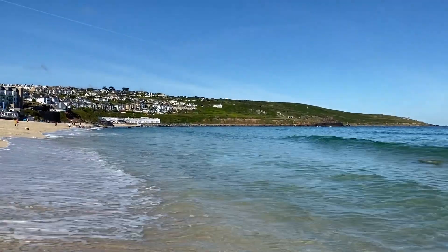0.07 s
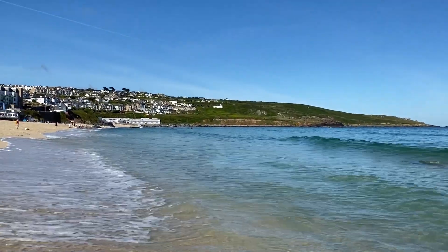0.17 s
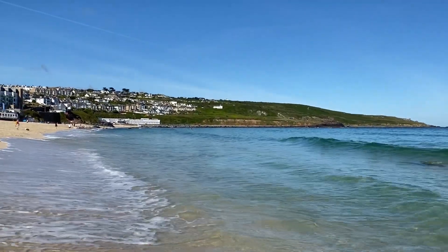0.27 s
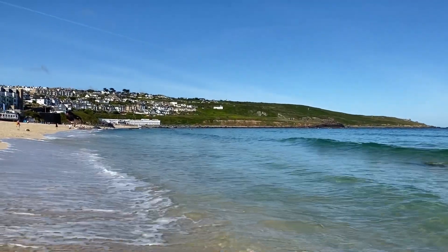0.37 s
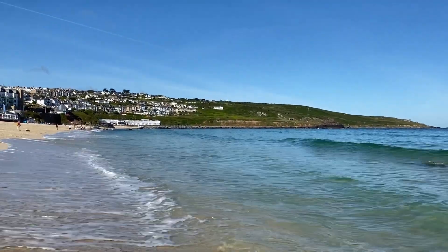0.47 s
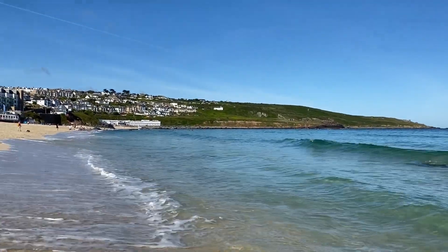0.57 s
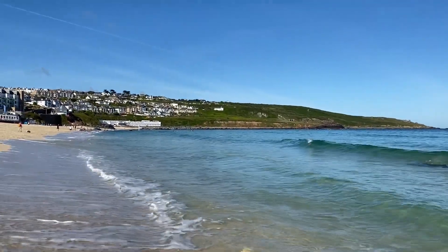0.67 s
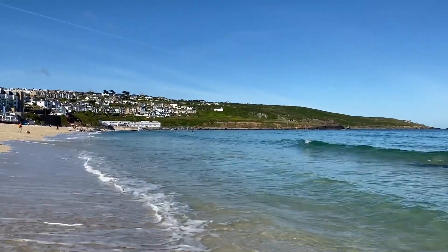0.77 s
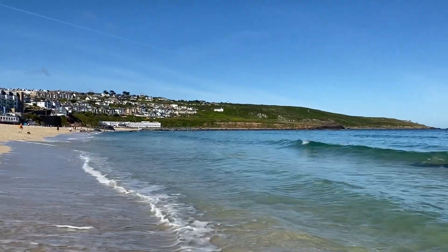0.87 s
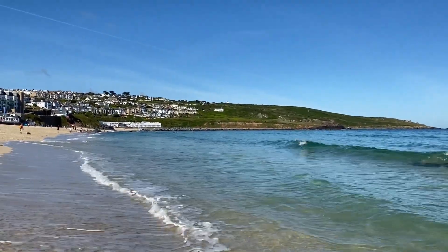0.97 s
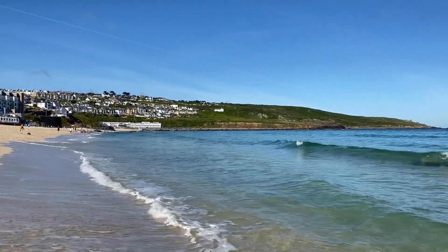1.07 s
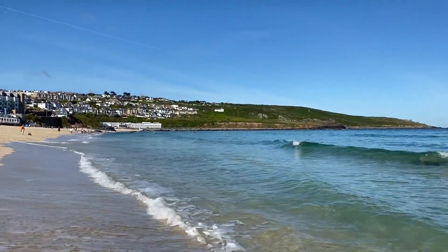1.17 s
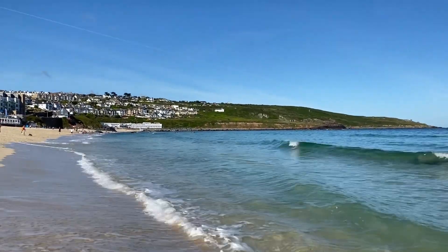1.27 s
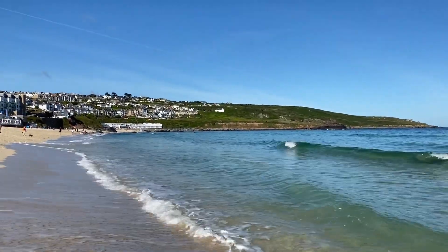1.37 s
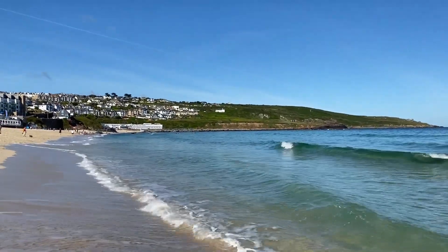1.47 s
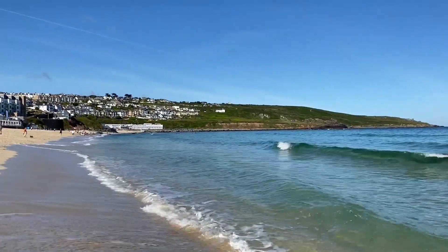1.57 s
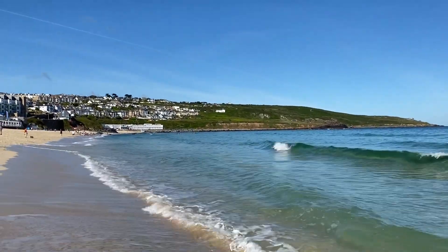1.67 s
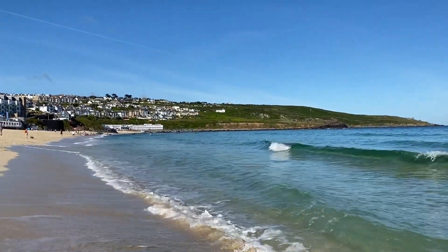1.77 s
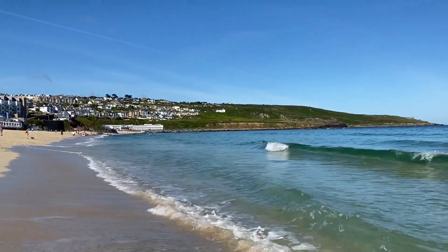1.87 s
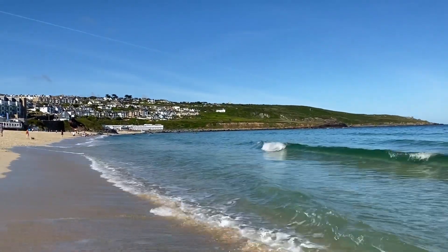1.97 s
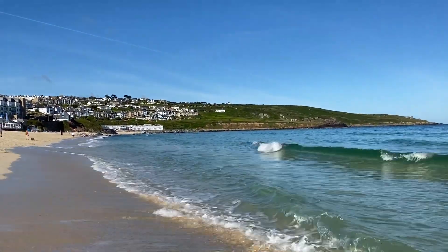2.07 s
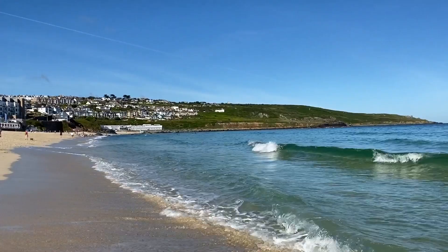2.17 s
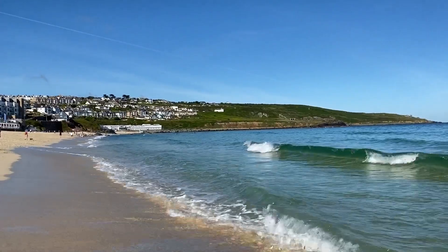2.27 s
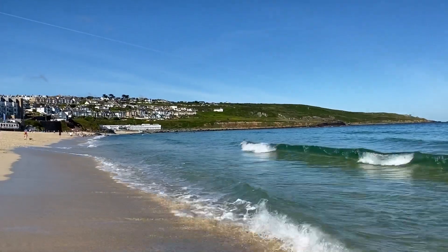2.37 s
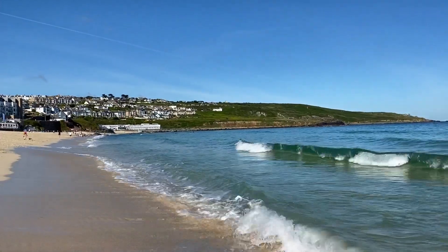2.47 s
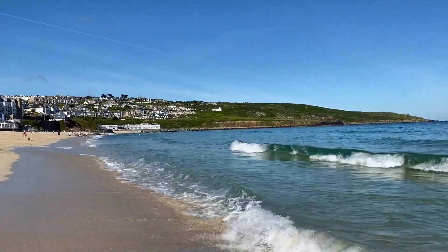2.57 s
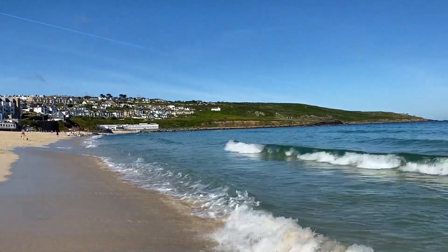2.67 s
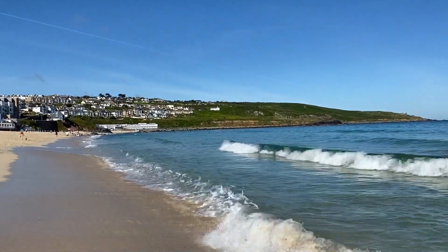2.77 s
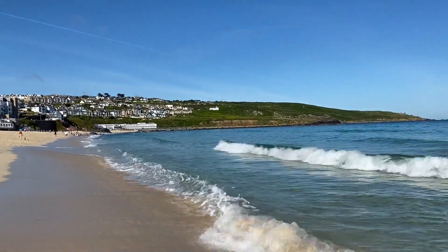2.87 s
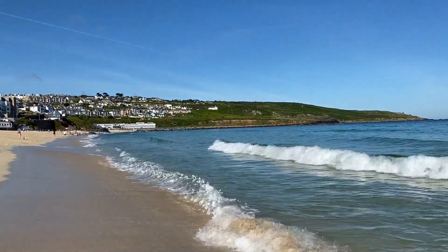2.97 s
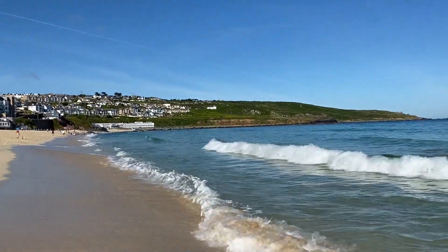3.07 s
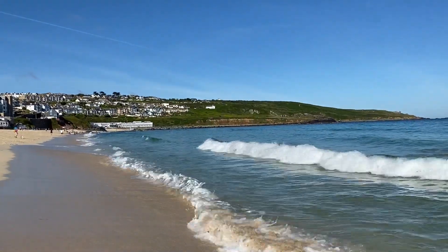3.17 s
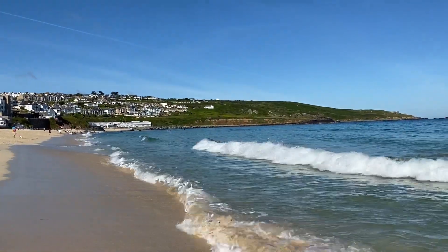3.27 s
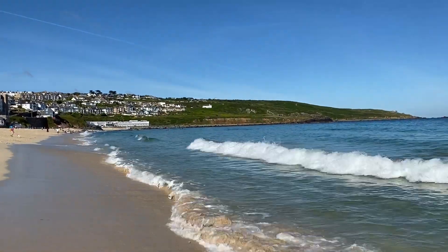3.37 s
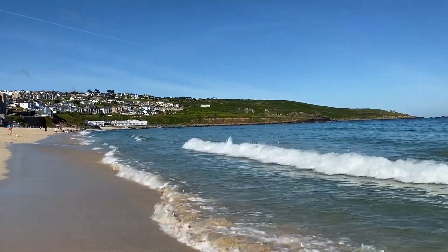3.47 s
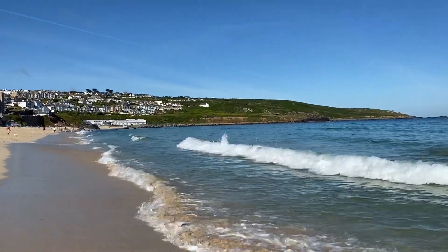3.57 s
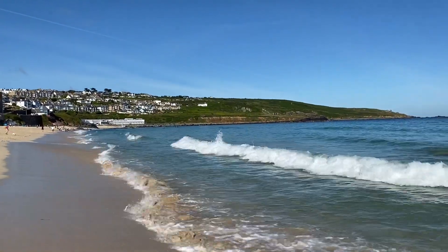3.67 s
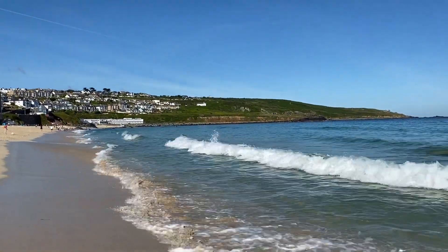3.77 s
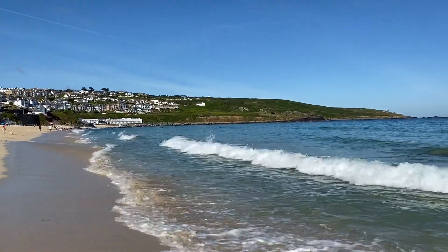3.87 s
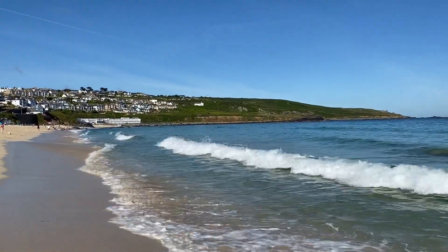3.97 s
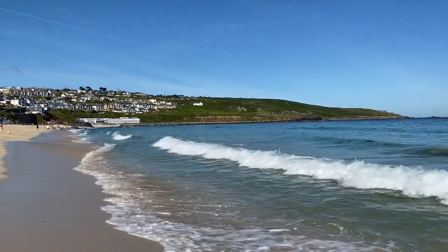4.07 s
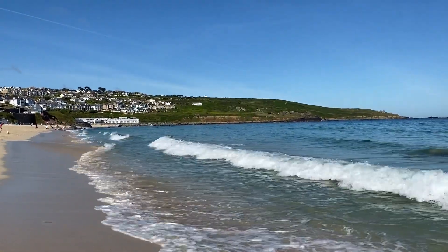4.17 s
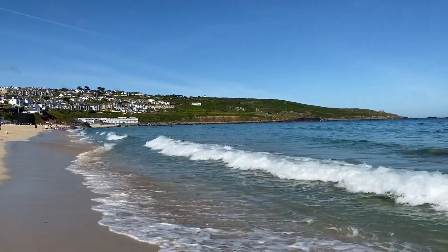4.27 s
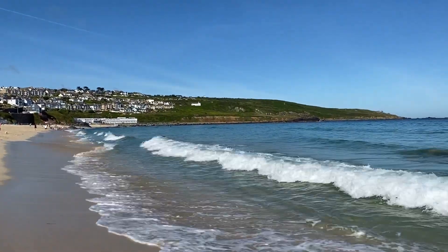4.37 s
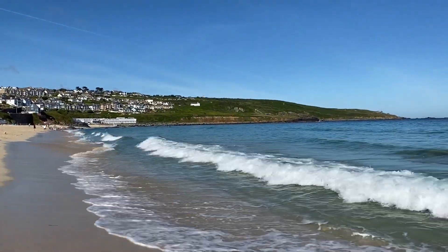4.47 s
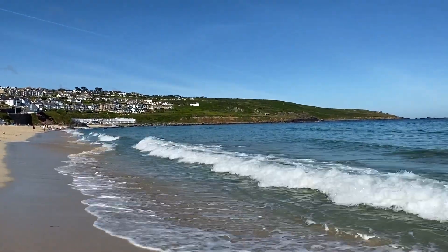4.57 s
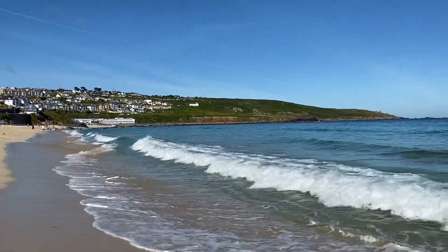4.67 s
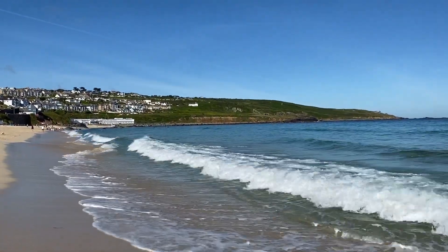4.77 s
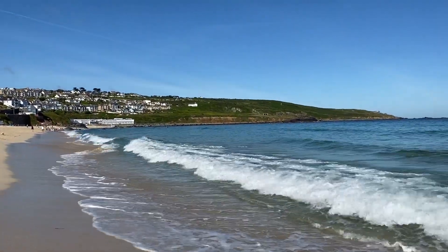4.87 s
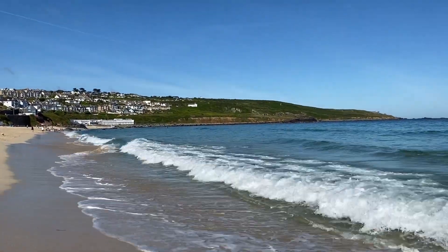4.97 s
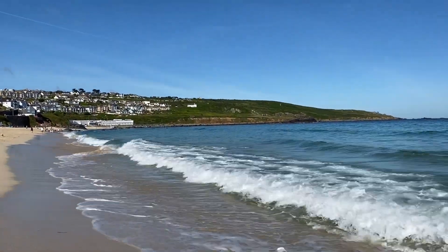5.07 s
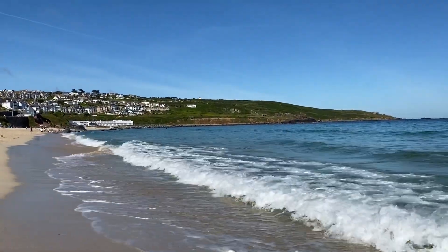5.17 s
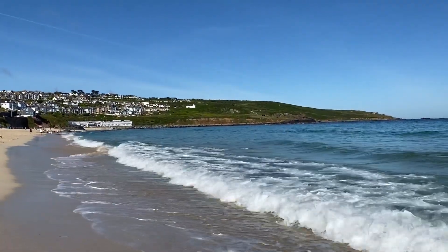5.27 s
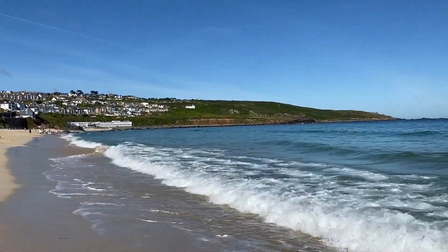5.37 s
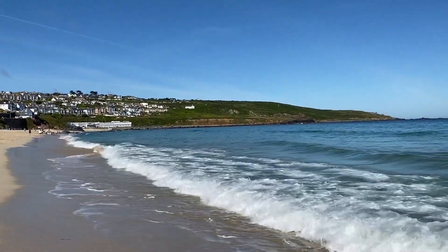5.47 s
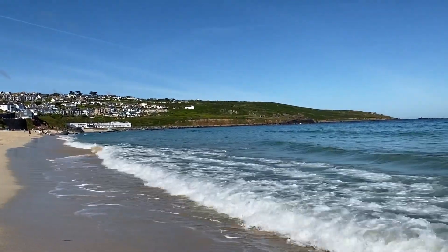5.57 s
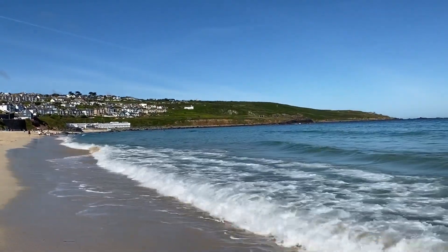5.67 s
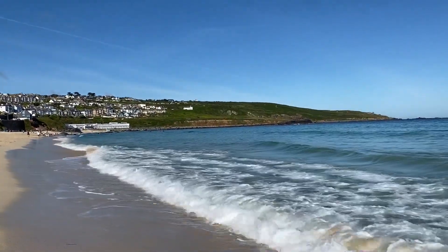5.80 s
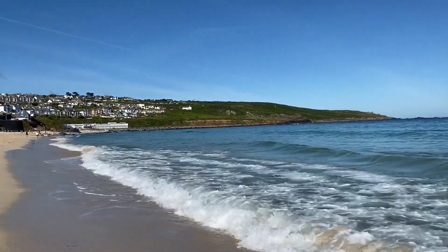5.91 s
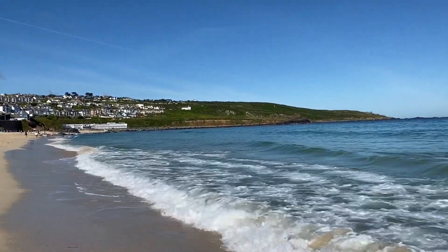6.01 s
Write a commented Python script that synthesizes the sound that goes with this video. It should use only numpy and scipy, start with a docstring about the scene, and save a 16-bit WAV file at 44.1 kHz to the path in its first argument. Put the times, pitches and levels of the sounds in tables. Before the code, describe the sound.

At the edge of a sandy beach, thin swash plops, gurgles and crackles with distinct bubbles. At about two seconds a small wave collapses close by with a low thump, roar and bright spray, while wind softly buffets the microphone. It ebbs into foam wash as a second wave swells and spills ashore. Close outdoor stereo, no echoing space.

```python
"""Small waves break and wash up a sandy beach, heard at the water's edge through two close microphone ports.
Roar, wash, spray and fizz are lumpy noise bands and bubble swarms that follow each wave's level.
Thin swash plops and fizzes, a wave collapses close by, a second rolls in behind it.
Single bubbles ring, short and long noise bursts splash, thump and rumble, and low noise gusts buffet
the microphone."""
import sys
import numpy as np
from scipy import signal
from scipy.fft import rfft, irfft
from scipy.io import wavfile
from scipy.ndimage import uniform_filter1d

SR = 44100
rng = np.random.default_rng(int(sys.argv[2]) if len(sys.argv) > 2 else 0)


def put_to_file(sound):
    """Save the sound as 16-bit audio at rate SR, in the file named by the first command-line argument."""
    columns = np.atleast_2d(sound).T  # one column per channel
    safe = np.clip(columns, -1, 1)
    whole_steps = np.round(safe * 32767)
    wavfile.write(sys.argv[1], SR, whole_steps.astype(np.int16))


N = 266364
WINDOW, HOP = 1024, 256  # samples
TIME = np.arange(N) / SR
FRAME_S = np.arange(N // HOP + 5) * HOP / SR
BIN_HZ = np.fft.rfftfreq(WINDOW, 1 / SR)


def gain_of(db):
    """Decibels to an amplitude factor."""
    return 10 ** (np.asarray(db) / 20)


def evened(x):
    """Scales to rms 1."""
    return x / np.sqrt(np.mean(x ** 2) + 1e-20)


def read(table, hz, order=1):
    """One column of a table, interpolated over log frequency."""
    columns = np.transpose(table)
    return np.interp(np.log(hz + 1), np.log(columns[0] + 1), columns[order])


def add(mix, s, sound):
    """Mixes a stereo sound in at time s."""
    part = mix[:, max(round(s * SR), 0):][:, :sound.shape[1]]
    part += sound[:, :part.shape[1]]


# Rushes of water: each swells, holds while it breaks, and ebbs; a negative ebb goes on rising.
# Each row: break in seconds, hold in seconds, nominal swell in dB/s, nominal ebb in dB/s,
# roar of the bubble clouds in dB, wash of the tumbling front in dB, spray in dB, fizz of the foam in dB.
# In order: edge ripple, its swash, next wave steepening, its close collapse, its thrown crest,
# second wave spilling further out, its crest toppling, its arrival at the shore.
RUSHES = [(0.614, .22, 28, 7, -46, -42, -45.5, -61), (1.404, 0.042, 22, 12, -39, -38, -41.5, -48.5),
          (1.98, 0.41, 12.5, 6, -44, -36.5, -45.5, -43), (2.335, 0.62, 56, 6, -29.4, -31, -37, -42),
          (2.58, 0.22, 25, 23, -51, -35.5, -34.5, -42.5), (3.9, 0.94, 3.5, -5.5, -38, -41, -42, -49.5),
          (5.387, 0.046, 9, 52, -33, -36.5, -39, -46), (5.556, .55, 41, 10, -28, -32.5, -44.5, -49.5)]
# Far shoreline, always there. One row: roar in dB, wash in dB, spray in dB, fizz in dB.
FAR_SHORE_DB = (-57.5, -50, -54, -56)


def surge(order, steepness, linger_s, fade):
    """Level in dB of one layer (0 roar, 1 wash, 2 spray, 3 fizz): powers of all waves and the far shore add."""
    power = gain_of(FAR_SHORE_DB[order]) ** 2
    for s, hold_s, swell_db_per_s, ebb_db_per_s, *layers_db in RUSHES:
        before_s = np.maximum(s - TIME, 0)
        after_s = np.maximum(TIME - s - hold_s - linger_s, 0)
        swell_db = steepness * swell_db_per_s * before_s
        ebb_db = fade * ebb_db_per_s * after_s
        power = power + gain_of(layers_db[order] - swell_db - ebb_db) ** 2
    return 10 * np.log10(power)


def roar_db():
    """The bulk of churning water: its bubble clouds outlast the splash."""
    return surge(order=0, steepness=0.73, linger_s=0.71, fade=0.84)


def tumble(depth_db=0.03, length_s=0.02):
    """The front pitches forward unevenly: one very slight waver shared by wash, spray and fizz."""
    lumps = evened(patches(length_s=length_s, width_hz=55)[:, len(BIN_HZ) // 2])
    return gain_of(depth_db * np.interp(TIME, FRAME_S, lumps))


def roar(large_hz=58, small_hz=165):
    """Clouds of bubbles throb as a whole; the bigger the wave, the deeper they reach."""
    level_db = roar_db()
    frame_db = np.interp(FRAME_S, TIME, level_db)
    low_hz = np.interp(frame_db, [-36, -32], [small_hz, large_hz])[:, None]
    depth = np.sqrt(1 / (1 + (low_hz / (BIN_HZ + 1)) ** 4))
    lumps_db = 0.96 * patches(length_s=0.026, width_hz=180)
    body = rush(read_sea(low_hz=40, high_hz=422) * depth, lumps_db)
    body = signal.sosfilt(signal.butter(4, 48, "highpass", fs=SR, output="sos"), body)
    return body * gain_of(level_db)


def wash():
    """The tumbling front: a lumpy rush and the gurgle of large bubbles."""
    lumps_db = 1.2 * patches(length_s=0.055, width_hz=610) + 2 * patches(length_s=0.017, width_hz=44)
    body = rush(read_sea(low_hz=358, high_hz=1500), lumps_db)
    gurgle = bubbles(per_s=900, low_hz=464.7, high_hz=1755, cycles=4.76, spread_db=2.5)
    share = bubble_share(thin=0.7, full=0.079)
    level_db = surge(order=1, steepness=0.96, linger_s=0.019, fade=0.73)
    return (np.sqrt(1 - share) * body + np.sqrt(share) * gurgle) * gain_of(level_db)


def spray():
    """Drops fall back on the water in flurries and ring small bubbles."""
    flurries_db = 2.3 * patches(length_s=0.03, width_hz=39) + 0.33 * patches(length_s=0.096, width_hz=1000)
    body = rush(read_sea(low_hz=1624, high_hz=6540), flurries_db)
    patter = bubbles(per_s=1800, low_hz=1698, high_hz=6510, cycles=7.0, spread_db=2.0)
    share = bubble_share(thin=0.15, full=0.11)
    level_db = surge(order=2, steepness=0.95, linger_s=0.14, fade=0.84)
    return (np.sqrt(1 - share) * body + np.sqrt(share) * patter) * gain_of(level_db)


def fizz():
    """Foam bursts in countless tiny ticks over a flickering hiss."""
    flicker_db = 2.6 * patches(length_s=0.019, width_hz=77) + 0.65 * patches(length_s=0.03, width_hz=1200)
    body = rush(read_sea(low_hz=6430, high_hz=18500), flicker_db)
    ticks = bubbles(per_s=2400, low_hz=6740, high_hz=12200, cycles=3.0, spread_db=12.0, count=14)
    level_db = surge(order=3, steepness=1.54, linger_s=0.018, fade=1.0)
    return (body + gain_of(-17.0) * ticks) * gain_of(level_db)


def lapping():
    """Near bubbles ring out one by one over the rush, most clearly in thin swash."""
    near = bubbles(per_s=170, low_hz=803, high_hz=3423, cycles=7.3, spread_db=2.5, count=30)
    share = bubble_share(thin=0.11, full=0.033)
    return near * np.sqrt(share) * gain_of(surge(order=1, steepness=0.98, linger_s=0.02, fade=0.99))


def bubble_share(thin, full):
    """In thin swash single bubbles stand out; in a full breaker they merge into a rush."""
    return np.clip(np.interp(roar_db(), [-44, -28], [thin, full]), 0, 1)


# Colour of the surf. Each row: frequency in Hz, relative level in dB per Hz.
SURF_COLOUR = [(45, -25), (80, -1.5), (110, -1), (170, -0.6), (300, -3), (420, -4.5), (600, -3),
               (760, -2.5), (960, -7), (1250, -8), (1550, -10.5), (2000, -13.5), (2400, -15), (3600, -17.5),
               (4400, -20), (5300, -21.5), (7000, -23.5), (8500, -26), (11000, -28.5), (15500, -32)]


def read_sea(low_hz, high_hz):
    """The surf's colour within one soft-flanked band."""
    below = 1 / (1 + (BIN_HZ / high_hz) ** 8)
    above = 1 / (1 + (low_hz / (BIN_HZ + 1)) ** 8)
    return gain_of(read(SURF_COLOUR, BIN_HZ)) * np.sqrt(below * above)


def patches(length_s, width_hz):
    """A random field of rms 1 over time and frequency, in lumps of the given extent."""
    field = rng.standard_normal((len(FRAME_S), len(BIN_HZ)))
    for axis, extent in enumerate([length_s * SR / HOP, width_hz * WINDOW / SR]):
        size = field.shape[axis]
        smooth = np.exp(-2 * (np.fft.rfftfreq(2 * size) * extent) ** 2 * np.pi)
        spectrum = rfft(field, 2 * size, axis=axis) * np.expand_dims(smooth, 1 - axis)
        field = irfft(spectrum, axis=axis).take(np.arange(size), axis)
    return evened(field)


def rush(colour, lumps_db):
    """Stereo noise of a given colour and lumpiness; the mean of its channels has rms 1."""
    spectra = in_stereo(BIN_HZ, len(FRAME_S)) * colour * gain_of(lumps_db)
    _, x = signal.istft(spectra, nperseg=WINDOW, noverlap=WINDOW - HOP, time_axis=1, freq_axis=2)
    x = x[:, :N]
    return x / np.std(x.mean(0))


# Stereo image by frequency; above about 8.5 kHz the two channels are nearly alike. Each row: frequency in Hz,
# likeness 0-1, phase lead of the left channel in rad, left minus right in dB.
STEREO_IMAGE = [(60, 1, -0.1, -1), (120, 0.93, -0.4, -1.5), (210, 0.93, -0.44, -4.5),
                (293, 0.76, -0.6, -3.2), (357, 0.57, -1.2, -3), (450, 0.54, -1.86, -1.5),
                (580, 0.48, -2, -3.3), (950, 0.77, -2.5, -4), (1200, 0.28, -2.4, -1.6),
                (1490, 0.53, -3, -.4), (1890, 0.04, -3.5, -1.4), (2420, 0.4, -5.5, -2.2),
                (3100, 0.28, -5.5, -1), (3770, 0.12, -6.5, 1), (4360, 0, -10.5, 1.6),
                (5000, 0.03, -11.5, 3), (5820, 0.04, -12.8, 3), (6600, 0.27, -12.5, 1),
                (7400, 0.32, -15, -1.2), (8650, 1, -16, 1), (9920, 0.7, -18, -1.5), (11400, 0.95, -20, 1.5),
                (13700, 1, -22.5, -1.5), (15700, 1, -24.5, 3)]


def in_stereo(hz, rows):
    """Random spectra for left and right: partly alike, with a phase lead and level balance by frequency."""
    a, b, c, d = rng.standard_normal((4, rows, len(hz)))
    same = np.clip(read(STEREO_IMAGE, hz, order=1), 0, 1)
    lead_rad = read(STEREO_IMAGE, hz, order=2)
    tilt = gain_of(read(STEREO_IMAGE, hz, order=3) / 2)
    right = a + 1j * b
    left = (same * right + np.sqrt(1 - same ** 2) * (c + 1j * d)) * np.exp(1j * lead_rad)
    return np.array([left * tilt, right / tilt])


def bubble(hz, cycles, glide=0.026):
    """A pocket of air swells into a short ring, its pitch rising as it nears the surface."""
    age = np.arange(int(6 * cycles * SR / hz) + 2) * hz / SR  # in cycles
    u = 2 * age / cycles
    return u * np.exp(1 - u) * np.sin(2 * np.pi * age * (1 + glide * age / cycles))


def bubbles(per_s, low_hz, high_hz, cycles, spread_db, count=36):
    """A swarm of many bubble sizes, each with its own random births, scattered along the shore; mean rms 1."""
    out = np.zeros((2, N))
    for hz in np.geomspace(low_hz, high_hz, count):
        chance = rng.random(N)
        loudness = np.minimum(rng.exponential(1, N), 4.5)
        births = (chance < per_s / count / SR) * gain_of(spread_db * loudness)
        ring = bubble(hz * rng.uniform(.96, 1.04), cycles * rng.uniform(.6, 1.4))
        sound = signal.oaconvolve(births, ring / np.linalg.norm(ring))[:N]
        sound = sound * gain_of(read(SURF_COLOUR, hz)) * np.sqrt(hz)
        lag_rad = -read(STEREO_IMAGE, hz, order=2) + rng.normal(0, 0.93)
        lag = round(SR * lag_rad / (2 * np.pi * hz))  # samples
        tilt = gain_of((read(STEREO_IMAGE, hz, order=3) + rng.normal(0, 5.1)) / 2)
        out += [np.roll(sound, lag) * tilt, sound / tilt]
    return out / np.std(out.mean(0))


PLOP_LAG_S = .00005  # the left port hears a near bubble first
SAND_ECHO_S, SAND_ECHO_DB = .0038, -12.5
# Single pockets of air closing in the swash.
# Each row: start in seconds, nominal peak in dB, starting pitch in Hz, ring in cycles, left minus right in dB.
AIR_POCKETS = [(.0095, -25.5, 1840, 1.2, -3), (0.061, -23.5, 840, 1.9, -1.5), (.068, -31, 3700, 3, 8),
               (0.1488, -18, 1150, 1.2, -5), (.1565, -27, 720, 1.4, -3), (.26, -39, 2320, 7.1, -1),
               (.279, -39, 545, 4.5, -7), (.4304, -33, 2290, 3, -3), (.4316, -25.5, 1800, 2.6, -3),
               (0.466, -30.5, 1160, 5, 0), (.522, -33, 805, 2.5, -.5), (0.643, -21, 1210, 1.9, -1),
               (.695, -26.5, 845, 2.5, -1), (.713, -28, 4300, 6.2, 3), (.77, -27.5, 1530, 3.6, -2.5),
               (.955, -35, 5200, 5.5, 8), (.964, -29, 4830, 10, 12), (.964, -32, 732, 1.6, 0),
               (.977, -29, 3600, 3, 6), (1.039, -31, 925, 2.5, -2), (1.354, -33, 570, 1.7, -2),
               (1.484, -23.5, 930, 3.2, -.5), (1.757, -27, 620, 2.4, -6)]


def plops():
    """The nearest bubbles, each with a faint bounce off the wet sand."""
    out = np.zeros((2, N))
    for s, db, hz, cycles, pan_db in AIR_POCKETS:
        ring = gain_of(db) * bubble(hz, cycles)
        add(out, s, np.outer([gain_of(pan_db / 2), 0], ring))
        add(out, s + PLOP_LAG_S, np.outer([0, gain_of(-pan_db / 2)], ring))
    return out + gain_of(SAND_ECHO_DB) * np.roll(out, round(SAND_ECHO_S * SR), axis=1)


BURST_RISE = 0.12  # rise time constant as a share of the decay's
GRAIN_S, GRAIN_DB = .003, 2.5  # a thin sheet breaks up into single drops
GRAINY_ABOVE_HZ = 900  # lower bursts are smooth
# Noise bursts over the surf: splashes, low thumps and small random swells of rumble, some of them long.
# Each row: start in seconds, level before the envelope in dB, centre in Hz,
# Gaussian half-width in octaves, decay time constant in seconds.
NOISE_BURSTS = [(.008, -39, 2740, 0.59, 0.05), (.061, -49, 3800, .7, 0.013), (0.426, -40, 2000, 0.45, .009),
                (0.439, -35, 1400, 0.48, 0.035), (0.615, -33.5, 1000, .6, .025),
                (0.656, -34, 1790, 0.45, 0.048), (0.708, -40, 4200, 1, 0.018),
                (0.734, -35, 1400, 0.38, 0.03), (0.914, -36, 2800, 0.8, .05),
                (0.948, -37.5, 3900, 0.65, 0.033), (0.957, -29, 1400, 0.55, .025),
                (1.4, -29.5, 1200, 1, 0.086), (1.479, -27.5, 1150, 0.95, 0.063),
                (1.483, -37, 3200, 0.85, 0.044), (1.81, -36.5, 2000, 0.9, .04), (1.943, -35, 1900, 1, 0.08),
                (2.315, -25.5, 119, 0.38, 0.16), (2.302, -25, 650, 0.71, 0.083),
                (2.553, -32, 7000, 0.97, .06), (2.59, -24, 160, 0.7, 0.049),
                (2.64, -23.5, 700, 0.67, 0.095), (3.03, -27, 198, .7, 0.056),
                (3.193, -29, 111.7, 0.56, 0.55), (3.613, -33, 198, 0.94, 0.1),
                (4.37, -34, 202, 0.37, 0.046), (5.379, -35, 3000, 0.75, 0.09),
                (5.482, -30, 520, 0.65, 0.082), (5.86, -22, 800, 0.66, 0.029),
                (5.872, -37, 2200, 0.52, 0.23)]


def bursts():
    """Coloured noise rises fast and dies away: high bursts crackle, low ones thump or rumble smoothly."""
    out, age_s, hz = np.zeros((2, N)), TIME[:SR], np.fft.rfftfreq(SR, 1 / SR)
    for s, db, centre_hz, octaves, length_s in NOISE_BURSTS:
        colour = np.exp(-.5 * (np.log2((hz + 1) / centre_hz) / octaves) ** 2)
        drops = evened(uniform_filter1d(rng.standard_normal(SR), max(round(GRAIN_S * SR), 1)))
        grain = gain_of(GRAIN_DB * np.minimum(drops, 2) * (centre_hz > GRAINY_ABOVE_HZ))
        burst = evened(irfft(in_stereo(hz, 1)[:, 0] * colour, SR) * grain)
        envelope = (1 - np.exp(-age_s / (BURST_RISE * length_s))) * np.exp(-age_s / length_s)
        add(out, s, gain_of(db) * burst * envelope)
    return out


BACKWASH_DB, BACKWASH_S = -48.5, 1.3  # starting level, time to fall to 1/e


def backwash():
    """Water of the last wave slides back down the sand, rumbles softly and dies away."""
    body = rush(read_sea(low_hz=95, high_hz=267), patches(length_s=.04, width_hz=100))
    return body * gain_of(BACKWASH_DB) * np.exp(-(TIME / BACKWASH_S) ** 2)


def tinted(gain, count=2):
    """Unrelated noises of rms 1, coloured by a gain over the full-length spectrum."""
    return evened(irfft(rfft(rng.standard_normal((count, N))) * gain, N))


BREEZE_DB = -58.5  # the wind between gusts
# Colour of the wind. Each row: frequency in Hz, relative level in dB per Hz.
WIND_COLOUR = [(15, -50), (28, -20), (45, -9), (62, -3), (95, -9), (200, -30), (600, -70)]
# Gusts on the microphone. Each row: strongest moment in seconds, level in dB, half-length to 1/e in seconds.
WIND_GUSTS = [(0.498, -46, .05), (1.185, -45, 0.035), (2.02, -38, .03), (2.137, -31.5, 0.06),
              (2.53, -35, .04), (2.9, -34, 0.084), (3.105, -38, 0.059), (3.343, -44, 0.051),
              (5.587, -48, 0.075)]


def wind():
    """Eddies push on both ports together as low noise; each gust swells and dies over a steady breeze."""
    eddies = tinted(gain_of(read(WIND_COLOUR, np.fft.rfftfreq(N, 1 / SR))), count=1)
    gusts = sum(gain_of(db) * np.exp(-((TIME - s) / half_s) ** 2) for s, db, half_s in WIND_GUSTS)
    port_gain = gain_of([[-.5], [.5]])
    return eddies * (gain_of(BREEZE_DB) + gusts) * port_gain


def scene():
    """The surf from bass to treble, near lapping, plops and noise bursts, the backwash and the wind."""
    surf = roar() + tumble() * (wash() + spray() + fizz())
    return surf + lapping() + plops() + bursts() + backwash() + wind()


EDGE_HZ = 15850


def record(dry):
    """The microphone's bass roll-off and the band limit."""
    thinned = signal.sosfilt(signal.butter(2, 32, "highpass", fs=SR, output="sos"), dry)
    lowpass = signal.firwin(511, EDGE_HZ, window=("kaiser", 9), fs=SR)
    return signal.oaconvolve(thinned, lowpass[None], "same")


dry = scene()
out = record(dry)
put_to_file(out)
```